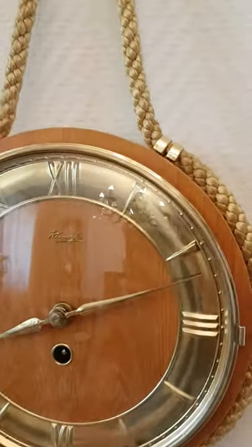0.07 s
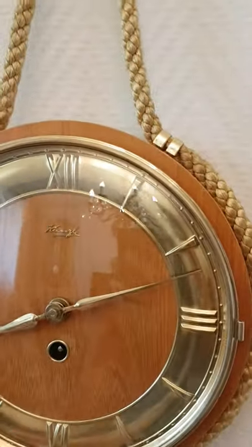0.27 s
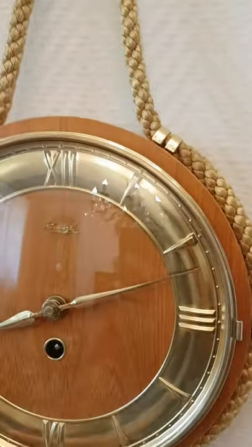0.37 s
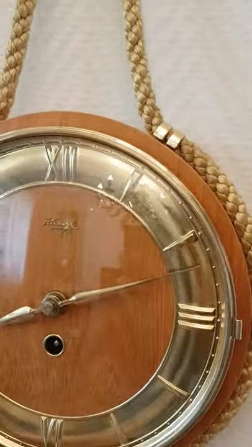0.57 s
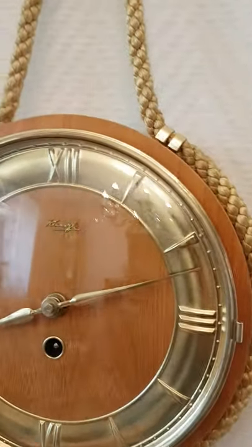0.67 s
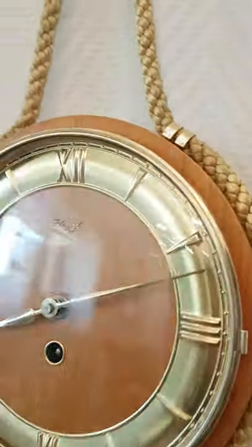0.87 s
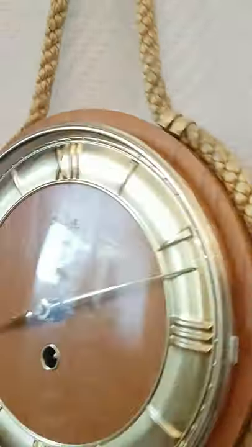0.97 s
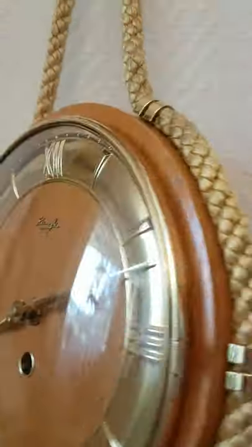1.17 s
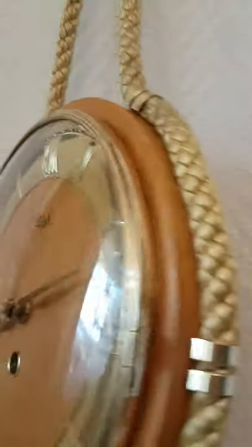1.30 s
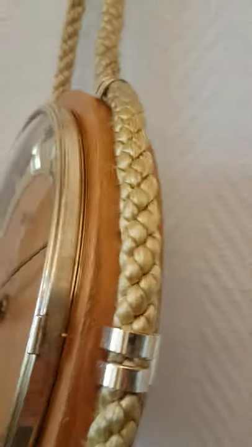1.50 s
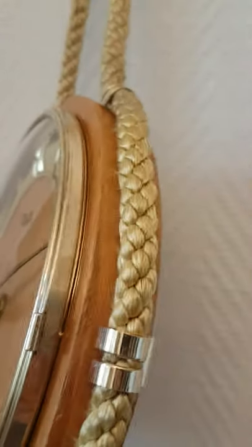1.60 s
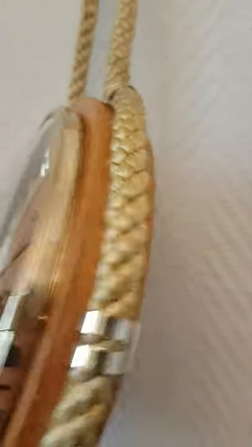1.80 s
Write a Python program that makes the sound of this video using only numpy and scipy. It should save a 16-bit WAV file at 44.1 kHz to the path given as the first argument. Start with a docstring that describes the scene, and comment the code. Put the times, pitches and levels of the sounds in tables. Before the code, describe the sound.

A wind-up wall clock ticks faintly and quickly in a quiet room; a heavy dull knock from the hand-held camera comes early, then a lighter knock midway and small sharp clicks, over low rumble and hiss.

```python
"""A quiet room: a wind-up wall clock ticks faintly, four and a half beats a second.
Each beat is a few metal contacts ringing the movement's modes, plus a scrape of filtered noise.
A hand-held camera gives dull knocks (damped sine, casing modes, noise), sharper clicks, soft rubs and
a brief rattle. A decaying-noise echo follows ticks, knocks and clicks; a low boom follows the heaviest
knock. Steady filtered noise gives the low rumble, two murmurs and microphone hiss."""
import sys
import numpy as np
from scipy import signal
from scipy.fft import rfft, irfft
from scipy.io import wavfile

SR = 44100
rng = np.random.default_rng(int(sys.argv[2]) if len(sys.argv) > 2 else 0)


def wav_record(signal):
    """Record a signal, one row per channel, as 16-bit PCM in the file named by sys.argv[1]."""
    frames = np.transpose(np.atleast_2d(signal))
    bounded = np.clip(frames, -1, 1)
    # unit amplitude maps onto the largest positive 16-bit level
    quanta = np.round(bounded * 32767).astype(np.int16)
    wavfile.write(sys.argv[1], SR, quanta)


N = 81585
SHORT = 4096  # samples in a short ring or noise burst


def undb(db):
    """Decibels to gain."""
    return 10 ** (np.asarray(db) / 20)


def clock_time(size=N):
    """Seconds at every sample."""
    return np.arange(size) / SR


def fade(t60, size=N):
    """Exponential decay by 60 dB in t60 seconds."""
    nepers = np.log(1000) * clock_time(size) / max(t60, 1e-4)
    return np.exp(-np.minimum(nepers, 20))


def pan(db):
    """Left and right gains that differ by db."""
    return undb(np.array([[db], [-db]]) / 2)


def add(out, start_s, sound):
    """Mix a sound in from a start time."""
    i = max(int(start_s * SR), 0)
    n = min(sound.shape[-1], out.shape[1] - i)
    out[:, i:i + n] += sound[..., :n]


def bins(size=N):
    """Frequencies of the spectrum in Hz, at least 1."""
    return np.maximum(np.fft.rfftfreq(size, 1 / SR), 1)


def colour(points, size=N):
    """Gain at every frequency, interpolated over log f from (Hz, dB) points."""
    hz, db = np.array(points, float).T
    return undb(np.interp(np.log(bins(size)), np.log(hz), db))


WIDE_HZ, MIN_WIDTH = 1400, 0.31  # channels unrelated from WIDE_HZ up


def noise(gain, size=N):
    """Stereo noise of rms 1: channels alike in the bass, unrelated in the treble."""
    mid, side = rfft(rng.standard_normal((2, size)))
    width = np.clip(np.hypot(MIN_WIDTH, bins(size) / WIDE_HZ), 0, 1)
    stereo = mid + width * side * np.array([[1], [-1]])
    x = irfft(gain * stereo / np.sqrt(1 + width ** 2), size)
    return x / x.std()


def burst(points, t60, tilt=1):
    """Contact noise: coloured noise with exponential decay."""
    return noise(colour(points, size=SHORT) * tilt, size=SHORT) * fade(t60, size=SHORT)


def ring(modes, scatter=0, size=SHORT):
    """Struck modes as damped sines; high ones reach the two microphones out of step."""
    t, out = clock_time(size), 0
    for k, (hz, db, t60) in enumerate(modes):
        sign = (-1) ** k
        lag = sign * min(hz / WIDE_HZ, 2) * np.pi / 8
        phase = scatter * 2 * np.pi * rng.random() + np.array([[lag], [-lag]])
        out = out + sign * undb(db) * fade(t60, size) * np.sin(2 * np.pi * hz * t + phase)
    return out


CONTACT_S = 0.00014  # time constant of the contact force


def onset():
    """Soft start of a contact: force builds exponentially."""
    return 1 - np.exp(-clock_time(size=SHORT) / CONTACT_S)


# escapement beats, tick and tock in turn: t/s, relative level/dB, brightness/(dB/octave), L-R/dB
BEATS = [(0.1758, -52.5, 0, 3), (0.398, -48.5, 1, -1), (.6218, -50.5, -1, 3), (.8418, -49.5, 0, 2),
         (1.0662, -48.5, -1, 2.5), (1.2874, -46.5, -4, -1.5), (1.5132, -50.5, 0, 0),
         (1.7322, -46.5, -4, -2.5)]
# brass movement modes: f/Hz, tick level/dB, tock level/dB, t60/s
MOVEMENT_MODES = [(2300, -16, -17, 0.038), (2960, -6, -4.5, 0.042), (3226, -13, 0, 0.046),
                  (4330, -16, -7.5, 0.038), (4800, -13, -13.5, 0.022), (5270, -14, -15, 0.024),
                  (7560, -9, -14.5, 0.022), (8250, -14, -19, 0.029), (9220, -21, -12, 0.018),
                  (10100, -15, -12.5, 0.027), (10800, -6, -19, 0.022)]
# contacts within a beat, pallet then lock: t after beat/s, relative level/dB
BEAT_CONTACTS = [(0, 1), (.0013, -2.5), (.0038, -1.5), (.0062, -7)]
# pallet scrape spectrum: f/Hz, relative density/dB
SCRAPE_SPECTRUM = [(1000, -26), (2800, -2), (5000, -3), (6500, -11), (10000, -7), (13000, -26)]
SCRAPE_DB, SCRAPE_T60_S, MOVEMENT_PIVOT_HZ = -9, 0.026, 5050


def escapement():
    """Quick metal contacts ring the movement; the two pallets differ in colour."""
    out, rise = np.zeros((2, N)), onset()
    for k, (start_s, db, brightness, side_db) in enumerate(BEATS):
        modes = []
        for hz, tick_db, tock_db, t60 in MOVEMENT_MODES:
            mode_db = tock_db if k % 2 else tick_db
            modes.append((hz, mode_db + brightness * np.log2(hz / MOVEMENT_PIVOT_HZ), t60))
        beat = undb(SCRAPE_DB) * burst(SCRAPE_SPECTRUM, SCRAPE_T60_S) * rise
        for after_s, contact_db in BEAT_CONTACTS:
            add(beat, after_s, undb(contact_db) * ring(modes, scatter=1) * rise / 2)
        add(out, start_s, undb(db) * pan(side_db) * beat / 2)
    return out


# handling knocks: t/s, relative level/dB, thud f/Hz, thud t60/s, casing level/dB,
# hardness/(dB/octave), L-R/dB
KNOCK_EVENTS = [(.1582, -44, 603, 0.028, 1, -6, 0.5), (.2125, -50, 580, 0.036, 6, 0, 4),
                (.2155, -39, 566, 0.029, -4, -0.5, -1), (.236, -35.5, 521, 0.0098, -0.5, 0.5, 1),
                (.248, -17.5, 564.7, 0.026, -7, -3, 1.5), (.2565, -35.5, 534, 0.018, -18, 2, -3),
                (.2592, -39.5, 585, 0.0071, 3, 4.5, -7.5), (.2622, -36, 540, 0.011, 1.5, 0, 8.5),
                (0.2777, -30, 644, 0.0098, -17, 4.5, 0.5), (.2885, -40, 567, 0.055, -19, -4, 2),
                (0.5165, -49, 554, 0.012, 1, -14, 3), (.537, -54, 528, 0.046, -1, -18, 5),
                (.754, -56.5, 664, 0.069, 7, -3, -1), (1.0102, -36.5, 1270, 0.019, 2.5, 2.5, -4),
                (1.0146, -28, 636, 0.023, -6, 2, 3), (1.0187, -45, 610, 0.042, 2.5, 8, 0)]
# hollow low casing modes, also stirred by clicks: f/Hz, level/dB, t60/s
HOLLOW_MODES = [(179, -28.5, 0.091), (249.8, -34.5, .12), (330, -17.5, 0.024), (445, -16.5, 0.049),
                (537.3, -25.5, 0.24), (652.5, -15, 0.1), (720, -18.5, 0.033), (813, -29.5, 0.15)]
# upper casing modes: f/Hz, level/dB before hardness tilt, t60/s
CASING_MODES = [(1018, -25, 0.087), (1046, -15, 0.021), (1234, -13.5, 0.028), (1366, -15.5, 0.027),
                (1600, -31, 0.047), (2060, -24, 0.023), (2610, -22.5, 0.032), (2930, -27, 0.043),
                (3116, -25, 0.053), (3650, -44.5, 0.088)]
# knock contact noise spectrum: f/Hz, relative density/dB before hardness tilt
KNOCK_SPECTRUM = [(150, -4.5), (500, 14.5), (1300, 5.5), (2000, -1.5), (3100, -5), (4500, -20),
                  (9000, -30.5), (16000, -35)]
KNOCK_CRACK_DB, KNOCK_CRACK_T60_S = -9.5, 0.033
THUD_RISE_S, THUD_DB = 0.0023, 5
CASING_PIVOT_HZ, HARDNESS_TOP_HZ = 1200, 3200  # noise tilts between these, modes at all f


def knocks():
    """Damped thud with casing ring and contact noise; hard contacts are brighter."""
    t, out = clock_time(size=SHORT), np.zeros((2, N))
    hollow = ring(HOLLOW_MODES, size=SR // 2)
    push = undb(THUD_DB) * (1 - np.exp(-t / THUD_RISE_S))
    tilt_hz = np.clip(bins(size=SHORT), CASING_PIVOT_HZ, HARDNESS_TOP_HZ)
    for start_s, db, hz, t60, ring_db, hardness, side_db in KNOCK_EVENTS:
        modes = [(f, mode_db + hardness * np.log2(f / CASING_PIVOT_HZ), decay)
                 for f, mode_db, decay in CASING_MODES]
        casing = ring(modes)
        tilt = undb(hardness * np.log2(tilt_hz / CASING_PIVOT_HZ))
        crack = undb(KNOCK_CRACK_DB) * burst(KNOCK_SPECTRUM, KNOCK_CRACK_T60_S, tilt)
        thud = -push * fade(t60, size=SHORT) * np.sin(2 * np.pi * hz * t)
        gain = undb(db) * pan(side_db)
        add(out, start_s, gain * (thud + undb(ring_db) * (casing + crack) * onset()))
        add(out, start_s, gain * hollow)
    return out


# sharp grip clicks: t/s, relative level/dB, hollow level/dB, contact noise level/dB, L-R/dB
CLICK_EVENTS = [(1.3059, -37, -12, -3.5, -2), (1.3098, -41.5, 5.5, -5.5, 8), (1.319, -55, 7, -6, -7),
                (1.3277, -50, 13.5, -7, 3.5), (1.4795, -49.5, 4, 2, -3.5), (1.483, -57.5, -3, 0, 9)]
# click modes: f/Hz, relative level/dB, t60/s
SNAP_MODES = [(236, -17, .1), (521, -7, 0.11), (564, -11.5, 0.11), (1240, -10.5, 0.036), (1480, -9.5, 0.02),
              (1620, -22, 0.11), (2194, -8, 0.02), (2650, -2.5, 0.025), (2843, -5, 0.032),
              (3140, -5, 0.085), (3504, -11, 0.035), (4350, -6.5, 0.037), (4940, -21, .03),
              (8260, -18, 0.028)]
# click contact noise spectrum: f/Hz, relative density/dB
CLICK_SPECTRUM = [(150, -34), (600, -3.5), (3000, 1.5), (5500, -13), (8200, -14), (10000, -29),
                  (16000, -25)]
CLICK_CRACK_T60_S = 0.02


def clicks():
    """Hard little snaps that also stir the hollow of the casing."""
    out = np.zeros((2, N))
    snap, hollow = ring(SNAP_MODES), ring(HOLLOW_MODES, size=SR // 2)
    for start_s, db, hollow_db, crack_db, side_db in CLICK_EVENTS:
        gain = undb(db) * pan(side_db)
        crack = undb(crack_db) * burst(CLICK_SPECTRUM, CLICK_CRACK_T60_S)
        add(out, start_s, gain * (snap / 2 + crack))
        add(out, start_s, gain * undb(hollow_db) * hollow)
    return out


# rubs and a brief rattle: centre t/s, 1/e length/s, level/dB, centre f/Hz
RUB_RATTLE_EVENTS = [(0.2, 0.057, -68.5, 2800), (.218, 0.016, -55.5, 2480), (0.379, .04, -64, 1800),
                     (0.482, 0.044, -72.5, 65), (0.55, 0.066, -71, 154), (0.751, 0.068, -65, 640),
                     (1.116, 0.059, -64.5, 2470), (1.476, 0.1, -65.5, 440), (1.541, 0.072, -66, 1790)]
# rub and rattle spectrum: f/Hz, relative density/dB before focus
RUB_RATTLE_SPECTRUM = [(60, -10), (140, 9.5), (400, -5.5), (650, 2.5), (1000, -5), (1800, -8), (2800, -6.5),
                       (3800, -15.5), (6000, -19), (16000, -35)]
FOCUS_DB, FOCUS_OCTAVES = 9.5, 0.61


def rubs_and_rattle():
    """Soft rubbing and one short rattle: Gaussian noise swells, each boosted round its own centre."""
    t, out = clock_time(), 0
    for at_s, length_s, db, hz in RUB_RATTLE_EVENTS:
        octaves = np.log2(bins() / hz)
        focus = undb(FOCUS_DB * np.exp(-(octaves / FOCUS_OCTAVES) ** 2))
        swell = np.exp(-(2 * (t - at_s) / length_s) ** 2)
        out = out + undb(db) * noise(colour(RUB_RATTLE_SPECTRUM) * focus) * swell
    return out


BOOM_START_S, BOOM_HZ, BOOM_DB, BOOM_RISE_S, BOOM_T60_S = 0.262, 66, -48, 0.035, 0.28


def boom():
    """The room's lowest resonance swells and dies after the heaviest knock."""
    t, out = clock_time(), np.zeros((2, N))
    swell = (1 - np.exp(-(t / BOOM_RISE_S) ** 2)) * fade(BOOM_T60_S)
    add(out, BOOM_START_S, undb(BOOM_DB) * np.sin(2 * np.pi * BOOM_HZ * t) * swell)
    return out


# room echo bands: f/Hz, t60/s, relative level/dB
ECHO_BANDS = [(100, 0.52, -5), (231, 0.32, 4.5), (540, 0.27, -3), (1260, 0.34, 0), (2920, 0.26, -1),
              (6000, 0.32, -4.5), (12000, 0.22, 1)]
ROOM_DELAY_S, ROOM_BUILD_S = 0.0033, 0.0019


def room_response():
    """Diffuse echo: noise with its own decay in each band, of unit energy."""
    log_hz = np.log([row[0] for row in ECHO_BANDS])
    wash, out = rfft(noise(1.)), 0
    for share, (_, t60, db) in zip(np.eye(len(ECHO_BANDS)), ECHO_BANDS):
        band = irfft(wash * np.interp(np.log(bins()), log_hz, share), N)
        out = out + undb(db) * fade(t60) * band
    out = out * np.clip((clock_time() - ROOM_DELAY_S) / ROOM_BUILD_S, 0, 1)
    return out / np.sqrt(np.sum(out ** 2) / 2)


def in_room(x, echo, wet_db):
    """Direct sound plus its echo by convolution."""
    return x + undb(wet_db) * signal.fftconvolve(x, echo, axes=1)[:, :N]


# still air and microphone hiss spectrum: f/Hz, relative density/dB
AIR_SPECTRUM = [(15, -36), (25, -20), (64, -3), (91, -3.5), (178, -5), (340, -3), (469, -3.5), (648, -4.5),
                (804, -4.5), (919, -8.5), (1170, -8), (2700, -11.5), (3830, -16), (7910, -24), (9810, -24),
                (14300, -19), (15500, -18)]
# narrow room murmurs: f/Hz, width/Hz, level/dB
MURMUR_BANDS = [(71.4, 9.2, -80), (355.5, 26, -77.5)]
AIR_DB = -67


def air():
    """Steady room tone and hiss as shaped noise, with two narrow low murmurs."""
    murmur = 0
    for hz, width_hz, db in MURMUR_BANDS:
        resonance = 1 / (1 + (2 * (bins() - hz) / width_hz) ** 2)
        murmur = murmur + undb(db) * noise(resonance)
    return undb(AIR_DB) * noise(colour(AIR_SPECTRUM)) + murmur


TICK_ROOM_DB, KNOCK_ROOM_DB, CLICK_ROOM_DB = -5, -8.5, -6  # echo levels


def scene():
    """Clock and handling sounds in one room, over its background."""
    echo = room_response()
    clock = in_room(escapement(), echo, TICK_ROOM_DB)
    handling = in_room(knocks(), echo, KNOCK_ROOM_DB) + in_room(clicks(), echo, CLICK_ROOM_DB)
    return clock + handling + boom() + rubs_and_rattle() + air()


TOP_HZ = 16000


def record(dry):
    """The recorder cuts the top steeply: elliptic low-pass, 0.1 dB ripple, 70 dB stopband."""
    low_pass = signal.ellip(12, .1, 70, TOP_HZ, fs=SR, output="sos")
    return signal.sosfilt(low_pass, dry)


dry = scene()
out = record(dry)
wav_record(out)
```